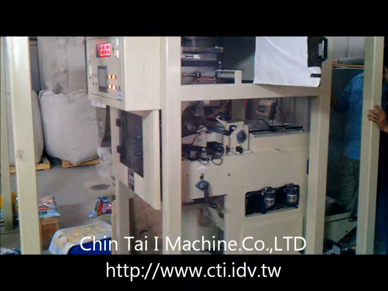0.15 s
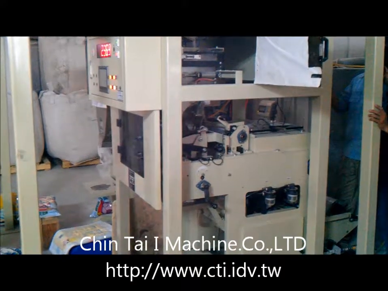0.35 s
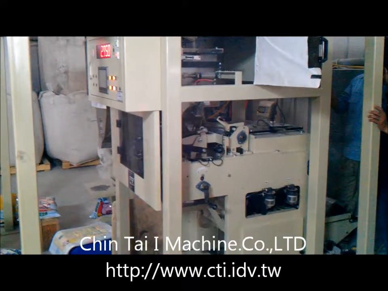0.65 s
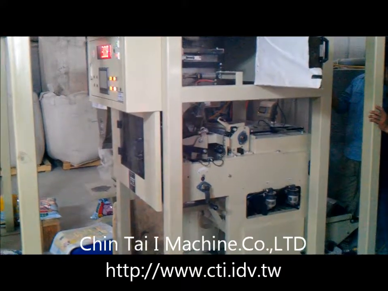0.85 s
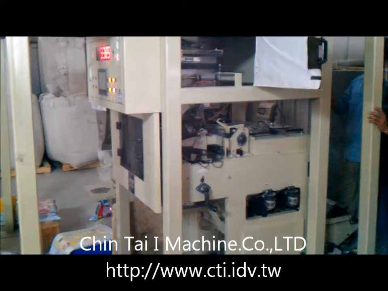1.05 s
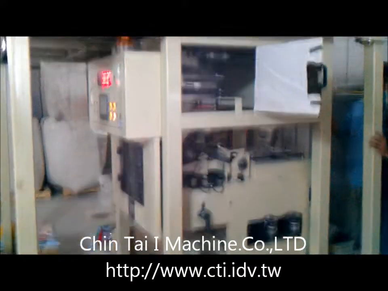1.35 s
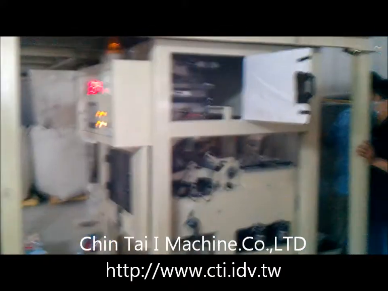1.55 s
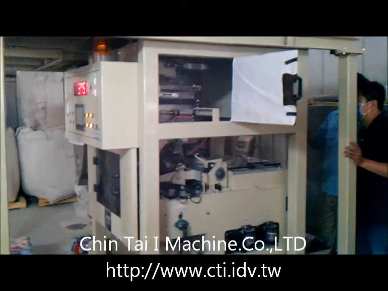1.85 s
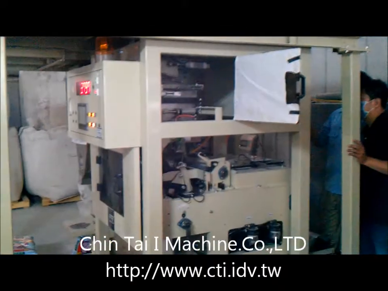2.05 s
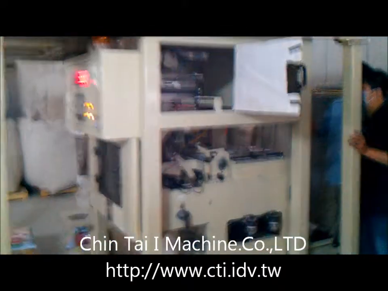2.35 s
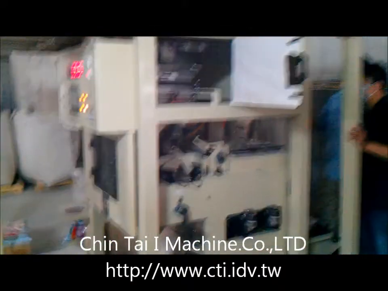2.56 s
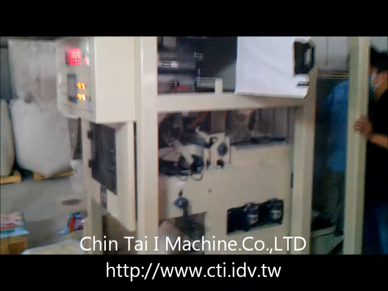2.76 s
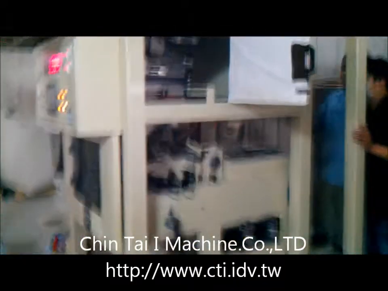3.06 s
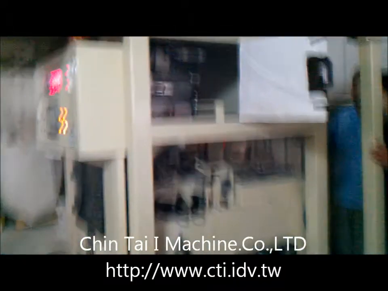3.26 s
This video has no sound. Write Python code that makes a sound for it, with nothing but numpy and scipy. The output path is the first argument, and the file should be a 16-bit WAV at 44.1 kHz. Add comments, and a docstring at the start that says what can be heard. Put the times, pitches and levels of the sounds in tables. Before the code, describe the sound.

A packing machine shakes and rattles quickly over a low hall roar; the shaking stops as a sharp, bright air jet bursts out and stays to the end, nearly burying mechanical clacks, on one overloaded mono microphone.

```python
"""Packing machine and air jet

In a factory hall a motor hums in steady overtones over a roar of shaped noise. A shaker strikes four blows
a turn: pulses ring its frame and gate rattling noise, while goods hiss down a chute as filtered noise.
Clamps knock in short noise bursts, and a loud jet of compressed air opens and holds as brightening noise
with echoes and whistles. The mono recorder's quick limiter squeezes all else under the jet.
"""
import sys
import numpy as np
from scipy import signal
from scipy.fft import rfft, irfft
from scipy.io import wavfile
from scipy.ndimage import uniform_filter1d

SR = 44100
rng = np.random.default_rng(int(sys.argv[2]) if len(sys.argv) > 2 else 0)


def transcribe(signal):
    """Save signal, clipped to [-1, 1], as a 16-bit WAV file at the path in sys.argv[1]."""
    frames = np.atleast_2d(signal).T
    limited = np.clip(frames, -1, 1)
    pcm = np.round(limited * 32767).astype(np.int16)
    wavfile.write(sys.argv[1], SR, pcm)


N = 149940

# Overtones of the motor, before its load: [multiple of the motor tone, level_db (rms)]
MOTOR_OVERTONES = [(2, -40), (4, -45), (5, -42), (10, -46), (12, -47)]
# Hum gain as the motor's load changes: [time_s, gain_db]
MOTOR_LOAD_GAIN = [(0, 2.5), (1.0, -4), (2.2, -2.5), (2.5, 1.5), (2.9, 0.5), (2.98, 5), (3.2, 2.5),
                   (3.25, 1.5), (3.4, 1.5)]
# Spectrum of the hall's steady roar: [freq_hz, density_db (per Hz, relative)]
HALL_SPECTRUM = [(25, -19), (60, -19), (110, -17), (180, -11.5), (280, -16), (700, -12.5), (1300, -12.5),
                 (2100, -13), (3800, -20.5), (6000, -19.5), (9000, -32.5), (15500, -38)]
# Blows in one turn of the shaker: [place in the turn (0-1), level_db (relative)]
SHAKER_BLOWS = [(0.029, -10), (0.271, -1.5), (.51, 2), (0.789, 0)]
# Modes of the shaker's frame: [pitch_hz, level_db (rms while running), t60_s]
FRAME_MODES = [(135.4, -49, 0.52), (177, -48, 0.31), (385.8, -34.5, 1), (563, -44.5, 0.76),
               (672.6, -37.5, 0.46), (1082, -49, 0.53), (1120, -60, 0.44), (5120, -36.5, 0.14)]
# Spectrum of the rattling shaken parts: [freq_hz, density_db (per Hz, relative)]
RATTLE_SPECTRUM = [(3000, -5.5), (6500, -33), (7600, 7), (8400, 2), (10400, 3), (12500, -3), (13500, -6.5),
                   (15500, -20)]
# Spectrum of goods sliding in the chute: [freq_hz, density_db (per Hz, relative)]
CHUTE_SPECTRUM = [(2350, -31), (4000, -13), (4720, -8), (5110, -4), (5850, -8.5), (7860, 4.5),
                  (10400, -6.5), (14200, -17), (15500, -13)]
# Level of the sliding goods, before the shaker's fade: [time_s, level_db (rms)]
CHUTE_LEVEL = [(0, -23.5), (.2, -24.5), (.34, -28), (.385, -18), (.44, -23.5), (.57, -28), (.615, -18.5),
               (.68, -25.5), (.72, -28.5), (.93, -29.5), (1.0, -15)]
# Spectrum of the shaker's rumble through the floor: [freq_hz, density_db (per Hz, relative)]
RUMBLE_SPECTRUM = [(25, -17), (60, -9), (120, -6), (250, -7), (1000, -2.5), (2500, -34), (8000, -50)]
# Clamp and arm knocks: [start_s, rise_s, decay_s, then level_db in each of the five knock bands]
KNOCK_EVENTS = [(.38, .005, 0.015, -27, -24.5, -29, -44, -29),
                (0.611, 0.0056, 0.024, -33, -38, -27, -38, -22),
                (.946, 0.0046, 0.025, -32, -31, -25, -26, -21),
                (1.722, .01, 0.027, -32.5, -42, -26.5, -26, -12.5),
                (1.75, 0.017, 0.21, -57, -58, -39, -47, -18.5),
                (1.843, 0.0037, 0.064, -51, -36, -25.5, -28, -26),
                (1.947, 0.0037, 0.024, -36, -30, -25, -27, -25),
                (2.12, 0.0027, 0.065, -32, -33, -22.5, -24, -21),
                (2.149, 0.014, 0.053, -28, -30, -35, -41, -31),
                (2.291, 0.02, 0.054, -32, -24, -22, -29, -15.5),
                (2.715, .01, 0.083, -33.5, -30, -27, -34, -23.5),
                (2.768, 0.0034, .02, -43, -45, -32, -28, -18.5),
                (2.839, 0.0045, 0.023, -35, -34, -39, -26, -25),
                (2.896, .008, 0.041, -27, -27, -26, -34, -30),
                (2.945, 0.0044, 0.011, -33, -42, -48, -43, -39),
                (3.11, 0.0038, 0.013, -46, -28.5, -31, -50, -43),
                (3.309, 0.011, 0.041, -39, -39, -28, -45, -23),
                (3.339, 0.025, 0.025, -46, -28, -25, -33, -25.5)]
# Centres of the five knock bands: [freq_hz]
KNOCK_BANDS_HZ = [250, 700, 1600, 3000, 5500]
# Course of the jet: [time_s, level_db (rms before the recorder), share of the brighter colour (0-1)]
JET_COURSE = [(.94, -8, 0), (.97, -9, 0.1), (1.05, -8.5, 0), (1.5, -5, 0.28), (1.7, -5, 0.06),
              (2.0, -6, .2), (2.2, -7.5, 0.57), (2.5, -6.5, 0.91), (2.9, -7.5, 0.97), (3.0, -8, 1),
              (3.2, -7.5, 0.9), (3.4, -10.5, 0.86)]
# Spectrum of the jet at first: [freq_hz, density_db (per Hz, relative)]
JET_EARLY_SPECTRUM = [(1500, -48), (4000, -20.5), (6300, -18), (7150, -13.5), (7450, -10), (7900, 0.5),
                      (8300, -0.5), (8850, -3.5), (9150, -3), (9400, -2), (10000, -9), (10700, -4),
                      (11000, -11), (12500, -13.5), (15500, -18)]
# Spectrum of the brighter jet: [freq_hz, density_db (per Hz, relative)]
JET_LATE_SPECTRUM = [(1500, -70), (4000, -23), (6000, -19.5), (7000, -8), (7500, -5), (7950, 3),
                     (8250, 1.5), (8600, 1.5), (9000, -1.5), (9400, -1), (10200, -2.5), (10800, -5.5),
                     (11100, -5.5), (12400, -13.5), (15500, -19.5)]
# Nozzle resonances: [pitch_hz, width_hz, early_db (over the hiss), late_db (over the hiss)]
NOZZLE_RESONANCES = [(7460, 310, -9, -27), (7715, 280, -5, -21), (8600, 420, -12, -8.5),
                     (8780, 110, -7, -16), (9550, 170, -20.5, -8.5), (10150, 94, -20, -11)]
# Brief rings of jet whistles and a clamp: [start_s, pitch_hz, width_hz, level_db (rms before swell), decay_s]
WHISTLE_EVENTS = [(.628, 4300, 200, -29, .01), (1.948, 1520, 90, -23, .015), (2.084, 8730, 150, 1, .035),
                  (2.15, 8000, 200, -12, .02), (.943, 7800, 300, -11, .15), (.943, 8850, 300, -10, .15)]

MOTOR_HZ, MOTOR_WAVER_DB = 173.4, 0.5
HALL_DB, HALL_FLICKER_DB = -30, 1
SHAKER_HZ, SHAKER_STOPS_S, SHAKER_FADE_S = 12.8, 0.95, 0.05
BLOW_SCATTER_DB = 1.2
RATTLE_DB, RATTLE_DECAY_S = -26.5, 0.012
THUMP_PLACE, THUMP_HZ, THUMP_S, THUMP_DB = 0.684, 56.5, 0.012, -40  # one a turn; dB of its envelope
WHINE_HZ, WHINE_WIDTH_HZ, WHINE_DB, WHINE_FLUTTER_DB = 5170, 230, -38, 2.0
RUMBLE_LEVEL_DB = -36
KNOCK_WIDTH = 1  # bandwidth as a share of the centre frequency
JET_OPENS_S, JET_RISE_S = 0.9425, 0.003
JET_FLICKER_DB, NOZZLE_FLICKER_DB = 0.7, 3.5
ECHO_T60_S, ECHO_DB = 0.06, -9
LIMIT_DB, LIMIT_KNEE, LIMIT_RATIO, LIMIT_SENSE_S = -12, 1.11, 9, 0.00011
SETTLE_DB, SETTLE_KNEE, SETTLE_RATIO, SETTLE_SENSE_S = -18.5, 2, 1.58, 0.013
SATURATION_DRIVE, TOP_HZ = 1.28, 15700


def undb(db):
    """Turn dB into gain."""
    return 10 ** (np.asarray(db) / 20)


def level(x, db):
    """Scale a sound to an rms level in dB."""
    return x * undb(db) / np.sqrt(np.mean(x ** 2))


def curve(t, table):
    """Draw straight lines through (time, value) points."""
    return np.interp(t, *np.array(table).T)


def coloured(spectrum):
    """Shape white noise by a spectrum drawn over log frequency, at rms 1."""
    hz, db = np.array(spectrum, float).T
    bin_hz = np.maximum(np.arange(N // 2 + 1) * SR / N, 1)
    gain = undb(np.interp(np.log(bin_hz), np.log(hz), db))
    return level(irfft(rfft(rng.standard_normal(N)) * gain, N), 0)


def band(x, hz, width_hz):
    """Pass a sound through one resonance."""
    b, a = signal.iirpeak(min(hz, 0.45 * SR), hz / width_hz, fs=SR)
    return signal.lfilter(b, a, x)


def narrow_noise(hz, width_hz, db):
    """White noise through the same resonance twice, at an rms level."""
    return level(band(band(rng.standard_normal(N), hz, width_hz), hz, width_hz), db)


def walk(rate_hz):
    """Wander between random levels, held then smoothed twice; spread near 1."""
    hold = int(SR / rate_hz)
    steps = np.repeat(rng.standard_normal(N // hold + 1), hold)
    return 1.3 * uniform_filter1d(uniform_filter1d(steps, hold), hold)[:N]


def swell(t, start, rise, decay):
    """Rise in a straight line, then fall exponentially."""
    fall = np.exp(-np.maximum(t - start - rise, 0) / decay)
    return np.clip((t - start) / rise, 0, 1) * fall


def motor(t):
    """Sum steady sine overtones, each wavering in level, under the motor's changing load."""
    hum = np.zeros(N)
    for multiple, db in MOTOR_OVERTONES:
        gain = undb(db + MOTOR_WAVER_DB * walk(11.05)) * np.sqrt(2)  # sine rms to peak
        hum += gain * np.sin(2 * np.pi * (round(multiple) * MOTOR_HZ * t + rng.random()))
    return hum * undb(curve(t, MOTOR_LOAD_GAIN))


def hall():
    """Roar of the hall as shaped noise with a slight flicker."""
    return coloured(HALL_SPECTRUM) * undb(HALL_DB + HALL_FLICKER_DB * walk(20))


def while_on(x, t):
    """Scale to rms 1 over the time the shaker runs."""
    return x / np.sqrt(np.mean(x[t < SHAKER_STOPS_S] ** 2))


def frame_and_rattle(t):
    """Each blow rings the frame's modes and opens a decaying burst of rattle."""
    place, db = np.array(SHAKER_BLOWS).T
    turns = np.arange(-8, 13)[:, None]
    lead = SR  # room for the turns before the start, so the frame already rings
    pulses = np.zeros(N + lead)
    when = ((turns + place) / SHAKER_HZ * SR).astype(int) + lead
    pulses[when] = undb(db + BLOW_SCATTER_DB * rng.standard_normal((len(turns), len(db))))
    frame = np.zeros(N)
    for hz, mode_db, t60 in FRAME_MODES:
        ring = band(pulses, hz, np.log(1000) / np.pi / t60)[lead:]  # t60 to bandwidth
        frame += undb(mode_db) * while_on(ring, t)
    keep = np.exp(-1 / (RATTLE_DECAY_S * SR))
    gate = signal.lfilter([1], [1, -keep], pulses)[lead:]
    return frame + undb(RATTLE_DB) * while_on(gate * coloured(RATTLE_SPECTRUM), t)


def chute(t):
    """Goods sliding in the chute hiss as shaped noise whose level moves."""
    return coloured(CHUTE_SPECTRUM) * undb(curve(t, CHUTE_LEVEL))


def thump(t):
    """One low sine pulse a turn under a bell-shaped envelope."""
    since = ((t * SHAKER_HZ - THUMP_PLACE + 0.5) % 1 - 0.5) / SHAKER_HZ  # seconds from the nearest thump
    envelope = undb(THUMP_DB) * np.exp(-(since / THUMP_S) ** 2 / 2)
    return envelope * np.sin(2 * np.pi * THUMP_HZ * since)


def drive_whine():
    """The shaker's drive whines as fluttering narrow noise."""
    return narrow_noise(WHINE_HZ, WHINE_WIDTH_HZ, WHINE_DB) * undb(WHINE_FLUTTER_DB * walk(39.6))


def shaker(t):
    """Blend the shaker's parts and its floor rumble, all fading together when it stops."""
    running = np.exp(-np.maximum(t - SHAKER_STOPS_S, 0) / SHAKER_FADE_S)
    rumble = coloured(RUMBLE_SPECTRUM) * undb(RUMBLE_LEVEL_DB)
    return (frame_and_rattle(t) + chute(t) + thump(t) + drive_whine() + rumble) * running


def knocks(t):
    """Clamps and arms clatter as noise bursts, each with its own balance of five bands."""
    bands = [narrow_noise(hz, KNOCK_WIDTH * hz, 0) for hz in KNOCK_BANDS_HZ]
    out = np.zeros(N)
    for start, rise, decay, *band_db in KNOCK_EVENTS:
        out += swell(t, start, rise, decay) * (undb(band_db) @ bands)
    return out


def whistles(t):
    """Jet whistles and a clamp's ring: narrow noise that swells and dies away."""
    out = np.zeros(N)
    for start, hz, width_hz, db, decay in WHISTLE_EVENTS:
        out += narrow_noise(hz, width_hz, db) * swell(t, start, JET_RISE_S, decay)
    return out


def room_echoes(x):
    """Rib the hiss with dense decaying echoes off the room."""
    tail = np.arange(SR // 5) / SR
    decay = undb(-60 * tail / ECHO_T60_S)
    echoes = level(rng.standard_normal(len(tail)) * decay, ECHO_DB) / np.sqrt(len(tail))
    echoes[0] = 1  # direct sound
    return signal.fftconvolve(x, echoes)[:N]


def jet(t):
    """Escaping air hisses between two noise colours, with flickering nozzle resonances."""
    time_s, db, share = np.array(JET_COURSE).T
    bright = np.clip(np.interp(t, time_s, share), 0, 1)
    hiss = np.sqrt(1 - bright) * coloured(JET_EARLY_SPECTRUM)
    hiss += np.sqrt(bright) * coloured(JET_LATE_SPECTRUM)
    for hz, width_hz, early_db, late_db in NOZZLE_RESONANCES:
        resonance = level(band(rng.standard_normal(N), hz, width_hz), 0)
        resonance_db = early_db + bright * (late_db - early_db)
        hiss += resonance * undb(resonance_db + NOZZLE_FLICKER_DB * walk(12))
    hiss = level(room_echoes(hiss), 0)
    hiss = hiss * undb(np.interp(t, time_s, db) + JET_FLICKER_DB * walk(16))
    return hiss * np.clip((t - JET_OPENS_S) / JET_RISE_S, 0, 1)


def scene():
    """Mix all sources at one microphone, the same in both channels."""
    t = np.arange(N) / SR
    mono = motor(t) + hall() + shaker(t) + knocks(t) + whistles(t) + jet(t)
    return np.array([mono, mono])


def sense(x, seconds):
    """Follow the power of the last moments, smoothed twice."""
    keep = np.exp(-1 / (seconds * SR))
    once = signal.lfilter([1 - keep], [1, -keep], x ** 2)
    return signal.lfilter([1 - keep], [1, -keep], once)


def squeeze(x, seconds, threshold_db, knee, ratio):
    """Turn down by a soft-kneed ratio as the sensed power passes the threshold."""
    over = sense(x, seconds) / undb(threshold_db) ** 2
    return x * (1 + over ** knee) ** (-(1 - 1 / ratio) / knee / 2)


def record(dry):
    """A very quick limiter, a slower gain stage, saturation, then a steep cut of the top."""
    held = squeeze(dry[0], LIMIT_SENSE_S, LIMIT_DB, LIMIT_KNEE, LIMIT_RATIO)
    held = squeeze(held, SETTLE_SENSE_S, SETTLE_DB, SETTLE_KNEE, SETTLE_RATIO)
    held = np.tanh(SATURATION_DRIVE * held) / SATURATION_DRIVE
    top_cut = signal.ellip(12, 0.2, 80, TOP_HZ, fs=SR, output="sos")  # order, ripple dB, stopband dB
    return signal.sosfilt(top_cut, np.array([held, held]))


dry = scene()
out = record(dry)
transcribe(out)
```